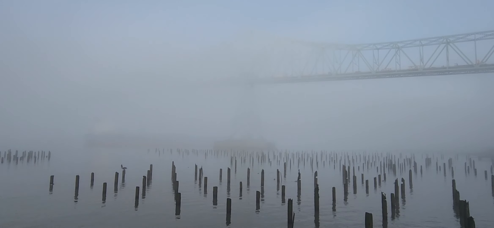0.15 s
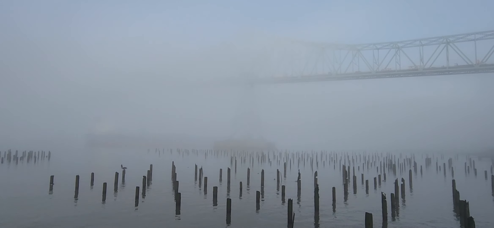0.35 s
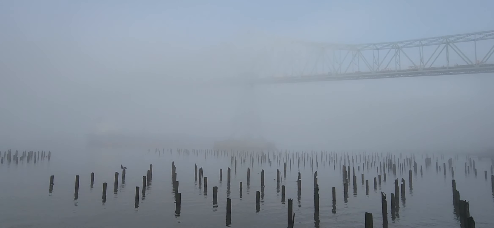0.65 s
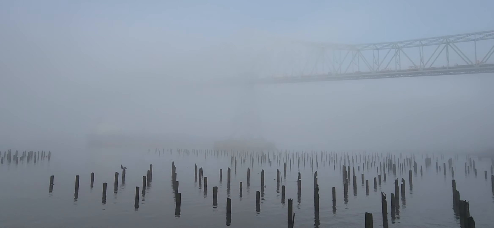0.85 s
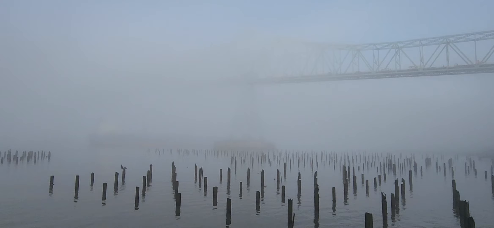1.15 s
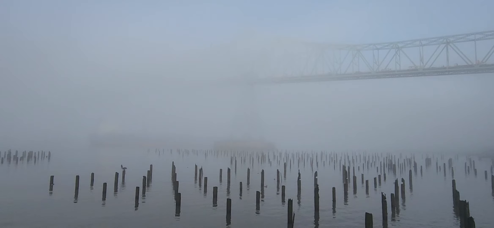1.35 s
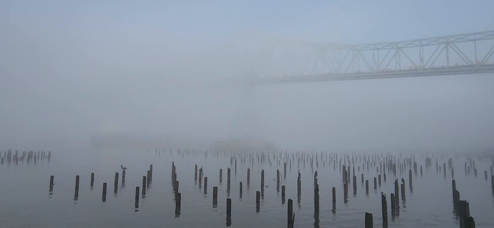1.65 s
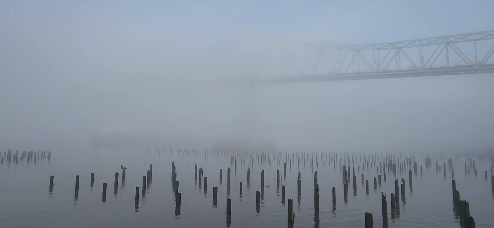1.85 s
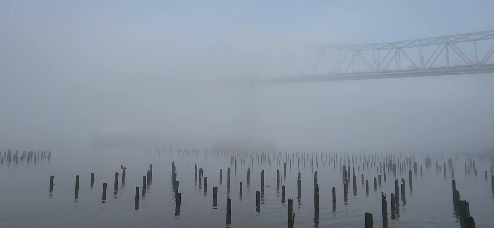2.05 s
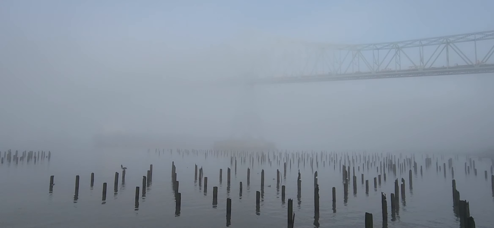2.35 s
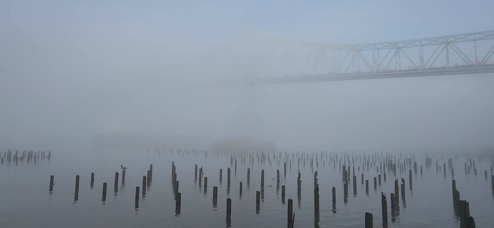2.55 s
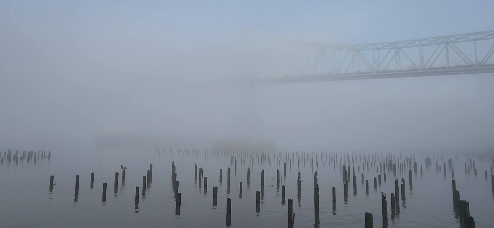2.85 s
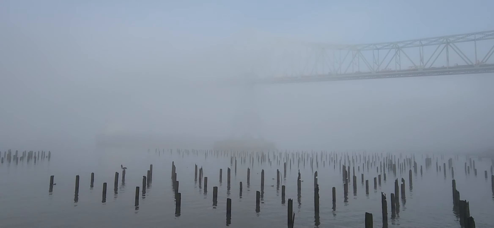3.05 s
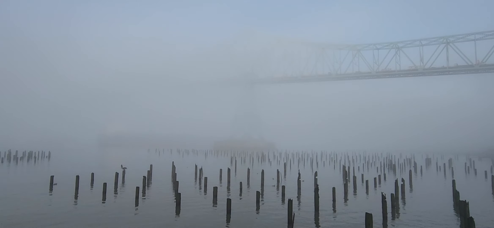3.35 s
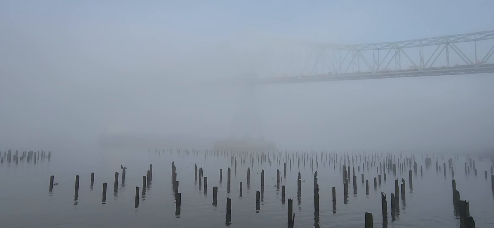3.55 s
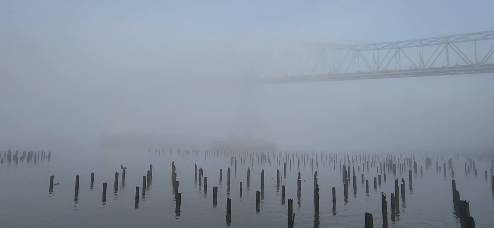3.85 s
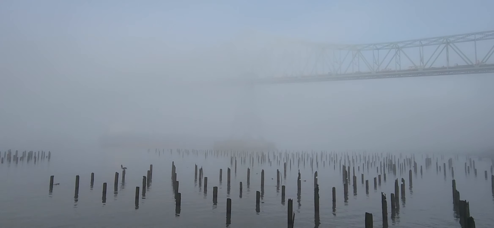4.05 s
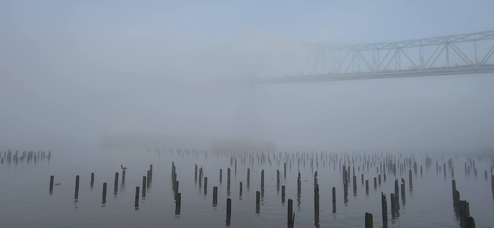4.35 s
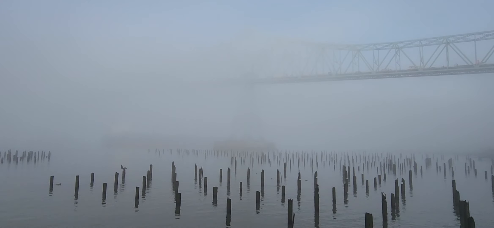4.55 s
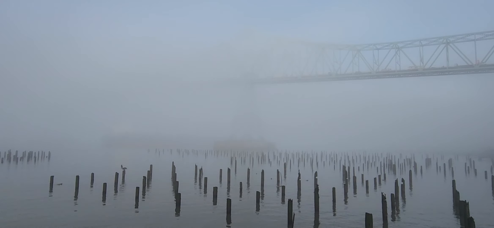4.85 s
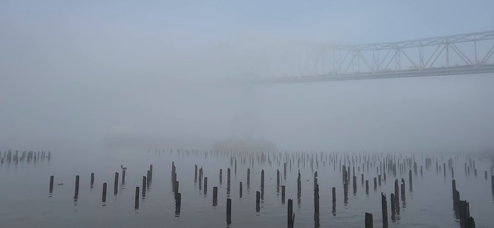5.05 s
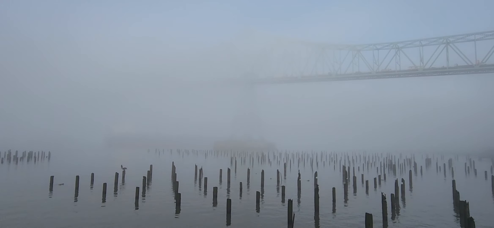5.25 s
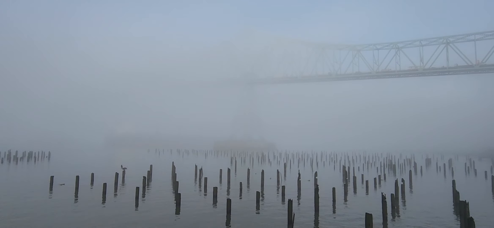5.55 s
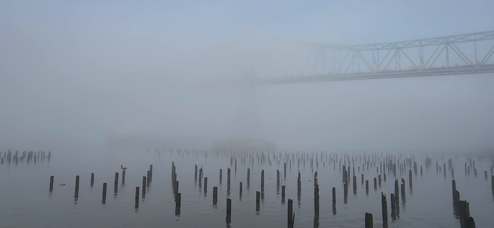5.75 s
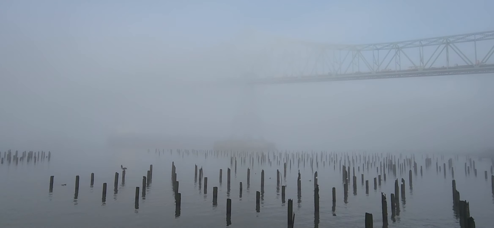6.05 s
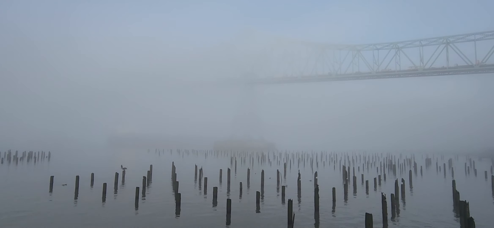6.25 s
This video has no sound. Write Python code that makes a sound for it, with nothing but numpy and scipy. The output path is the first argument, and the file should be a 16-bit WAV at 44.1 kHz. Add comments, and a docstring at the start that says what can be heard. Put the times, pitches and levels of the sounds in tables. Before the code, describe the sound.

Heard from an open riverbank, a low foghorn note hangs throughout over the rumble and hum of a distant ship, the tones wavering as they cross the water. Early on, birds ahead and to the right whistle brief rising and falling chirps, one breaking into a sharp squeal. After that the engine throb carries on with a soft wash of far traffic and faint wavelets, and a last small chirp.

```python
"""A low diesel throb and one held horn note, far across a foggy river, over an even wash of traffic and water.
The ship's six cylinders fire in a steady rhythm while its other machines hum; the tones fade and swell
as they carry over the water. Wavelets fizz at old pilings and a very faint whine hangs on the left.
Birds whistle short arched chirps, echoed by the shore; one loud squeal breaks an octave down."""
import sys
import numpy as np
from scipy import signal
from scipy.fft import rfft, irfft
from scipy.io import wavfile

SR = 44100
rng = np.random.default_rng(int(sys.argv[2]) if len(sys.argv) > 2 else 0)


def store_wav(level_fs):
    """Save 16-bit WAV to argv[1]."""
    pcm = np.round(np.clip(np.atleast_2d(level_fs), -1, 1) * 32767)
    wavfile.write(sys.argv[1], SR, pcm.T.astype(np.int16))


N = 281799
TIME_S = np.arange(N) / SR
BINS_HZ = np.maximum(np.fft.rfftfreq(N, 1 / SR), 1)
LEFT_BANK_LEAD_MS = .44

# Firing tone and its octave, over the water: time_s, level_db
FIRING_FADE = [(0.0, -46), (1.4, -39), (2.8, -41.5), (3.1, -36), (4.2, -36), (4.4, -41), (4.65, -35.5),
               (5.3, -33), (6.39, -34.5)]
FIRING_OCTAVE_FADE = [(0.0, -35.5), (1.41, -28.5), (2.31, -30.5), (3.06, -28), (3.24, -33.5), (4.18, -37),
                      (4.5, -56), (4.61, -38.5), (5.07, -42), (5.3, -32.5), (5.64, -38), (6.39, -32.5)]
# Orders in step with the firing: firing_multiple, level_db
THROB_ORDERS = [(3 / 2, -46), (5 / 2, -46.5), (3, -46.5)]
# Weak orders from unequal cylinders: firing_multiple, level_db
IMBALANCE_ORDERS = [(7 / 6, -56), (5 / 3, -53), (11 / 6, -57), (13 / 6, -56.5), (7 / 3, -56.5)]
# Exhaust rumble: freq_hz, density_db_per_hz
RUMBLE_SPECTRUM = [(12, -94), (24, -74.5), (42, -59), (90, -62), (135, -62), (165, -64.5), (195, -69.5),
                   (230, -70), (280, -80.5), (450, -105), (900, -170)]
# Steady ship machines: pitch_hz, level_db
MACHINE_HUMS = [(58.5, -47), (117.1, -49), (305.5, -58.5), (313.6, -56.5), (359, -63)]
# Machine hunting in speed: time_s, pitch_hz, level_db
HUNTING_HUM = [(0, 135, -41), (.35, 133, -56), (1.2, 135, -51.5), (1.5, 135.7, -55.5), (2.3, 136, -47),
               (3.55, 135, -41.5), (4.25, 138, -58), (4.5, 136, -40), (4.7, 137.6, -48), (5.0, 138.4, -40),
               (5.6, 134.5, -49), (5.85, 136, -40), (6.39, 137, -45)]
# Horn fundamental and octave, over the water: time_s, level_db
HORN_ROOT_FADE = [(0.0, -48), (0.16, -42), (0.75, -48), (1.1, -42), (1.4, -46), (2.37, -40.5),
                  (3.15, -40.5), (3.75, -48.5), (4.3, -47), (4.52, -41), (5.0, -39), (5.55, -39.5),
                  (5.9, -48.5), (6.12, -41), (6.23, -59), (6.39, -52)]
HORN_OCTAVE_FADE = [(0.0, -53), (0.34, -46), (0.75, -60.5), (1.25, -59), (1.6, -49), (2.1, -44.5),
                    (2.5, -56.5), (2.9, -67), (3.11, -52), (3.4, -59), (5.15, -59.5), (5.5, -54),
                    (5.92, -50), (6.16, -59), (6.39, -63)]
# Open-air noise between the ears: freq_hz, correlation
EAR_CORRELATION = [(60, 0.76), (170, 1), (300, 0.56), (540, 0.78), (680, 0.21), (880, 0.6), (1150, -0.16),
                   (1500, -0.78), (1850, -0.13), (8000, -0.0053)]
# Far traffic and water: freq_hz, density_db_per_hz
WASH_SPECTRUM = [(150, -83.5), (310, -73), (520, -74.5), (780, -76.5), (1100, -83), (1450, -82),
                 (1830, -90.5), (2150, -88.5), (2450, -99.5), (3700, -101), (4300, -102.5), (5000, -108.5),
                 (5550, -104.5), (6250, -113), (7200, -106), (8100, -109), (9200, -132), (15000, -134)]
# Swell of the wash: time_s, gain_db
WASH_GAIN = [(0, 0), (2, 0), (3.6, -0.1), (4.5, -0.3), (4.93, 0.9), (5.2, .6), (5.6, -0.1), (6.39, 0.6)]
# Wash arriving along the left bank: freq_hz, power_share
LEFT_BANK_SHARE = [(200, 0.0059), (500, 0.021), (1000, 0.21), (2100, 0.28), (8000, 0.16)]
# Balance of the wash: freq_hz, left_minus_right_db
WASH_BALANCE = [(200, -3.5), (320, 3.5), (550, -1), (1400, -0.4), (1850, 2), (2200, 1), (2550, 10.5),
                (3700, 6.5), (5200, -0.1), (6800, 3), (8000, 6.5)]
# Wavelets at the pilings: crest_s, half_width_s, level_db
WAVELETS = [(0.599, .2, -80), (2.95, .12, -79.5), (3.8, 0.21, -77), (4.137, .05, -75),
            (4.65, 0.0925, -76.5), (4.92, .13, -79)]
# Wavelet fizz: freq_hz, relative_db
FIZZ_SPECTRUM = [(1500, -13.5), (3300, -0.5), (5500, 0), (7500, -6), (8400, -11.5), (9300, -29.5)]
# Chirps: top_s, rise_s, fall_s, top_hz, pointedness (1 = round), level_db, accent_db, flutter_db,
# right_lead_ms
CHIRP_ARCHES = [ (0.389, 0.040, 0.046, 2760, .6, -50.5, 1, 3, .58),
                (0.442, 0.016, 0.016, 2070, 1, -57, -1, 2.8, 0.54),
                (1.425, .085, 0.047, 2200, 3.7, -53.5, 0, 2.5, 0.042),
                (2.002, .042, .056, 3137, 2.0, -53, -0.5, 1.5, .05),
                (2.695, .034, 0.046, 2415, 1.4, -55.5, 5, 1.4, .58),
                (6.336, 0.021, 0.031, 2370, 1.4, -59, 0, 2.5, .58)]
# Microphone colouring of the birds: freq_hz, gain_db, left_minus_right_db
BIRD_EQ = [(1770, -10, -1), (2060, -1.5, 2.5), (2320, -6, 6.5), (2460, -5, 4.5), (2620, -9.5, 1),
           (3150, -5.5, -3), (3520, -9.5, 1.5), (3850, -14.5, 0), (4900, -8.5, -1), (6200, -20.5, -1.5),
           (7500, -8.5, 6.5)]
# Shore reflections: delay_s, level_db, t60_s
SHORE_ECHOES = [(0, -6, .35), (0, -8, .85), (.055, -14, .07), (0.224, -12, 0.15)]


def from_db(db):
    """Decibels to gain."""
    return 10 ** (np.asarray(db) / 20)


def unit_rms(x):
    """Scale to unit power."""
    return x / np.sqrt(np.mean(x ** 2) + 1e-20)


def over_time(rows):
    """Each value column, interpolated per sample."""
    time_s, *columns = np.transpose(rows)
    return [np.interp(TIME_S, time_s, column) for column in columns]


def over_bins(rows):
    """Table interpolated per bin, over log frequency."""
    freq_hz, value = np.transpose(rows)
    return np.interp(np.log(BINS_HZ), np.log(freq_hz), value)


def pan(left_minus_right_db):
    """Left and right gains."""
    return from_db(np.array([[.5], [-.5]]) * left_minus_right_db)


def from_left(lead_ms):
    """Spectral factors that delay the right ear."""
    return np.exp(-2j * np.pi * BINS_HZ * lead_ms * 1e-3 * np.array([[0], [1]]))


def from_right(x, lead_ms):
    """Mono to stereo, right ear early."""
    return np.array([x, np.interp(TIME_S + lead_ms * 1e-3, TIME_S, x)])


def drift(rate_hz):
    """Smooth random wander, unit spread."""
    hop = 100
    pole = np.exp(-2 * np.pi * rate_hz * hop / SR)
    slow = signal.lfilter([1], [1, -2 * pole, pole * pole], rng.standard_normal(2 * N // hop))
    slow = unit_rms(slow[-(N // hop + 2):])
    return np.interp(np.arange(N) / hop, np.arange(len(slow)), slow)


def white_spectra(channels):
    """Independent noises, unit power per Hz."""
    return rfft(rng.standard_normal((channels, N))) * np.sqrt(SR / 2)


def open_air():
    """Spectra of noise from all round: alike at both ears in the bass, unrelated in the treble."""
    mid, side = white_spectra(2)
    alike = np.clip(over_bins(EAR_CORRELATION), -1, 1)
    return np.sqrt((1 + alike) / 2) * mid + np.sqrt((1 - alike) / 2) * side * [[1], [-1]]


def far_tone(cycles, level_db, scatter, rate_hz):
    """Direct sine plus scattered copies of wandering strength and phase."""
    phase = 2 * np.pi * (cycles % 1)
    in_phase = (1 + scatter * drift(rate_hz)) * np.sin(phase)
    quadrature = scatter * drift(rate_hz) * np.cos(phase)
    return from_db(level_db) * unit_rms(in_phase + quadrature)


def diesel(firing_hz=45.01, sag_hz_per_s=.02, wander_hz=.015):
    """Only low orders of the exhaust pulses carry; half orders in step with them make the throb."""
    cycles = np.cumsum(firing_hz - sag_hz_per_s * TIME_S + wander_hz * drift(.38)) / SR
    firing_db, = over_time(FIRING_FADE)
    octave_db, = over_time(FIRING_OCTAVE_FADE)
    tones = far_tone(cycles, firing_db, scatter=.035, rate_hz=3.6)
    tones += far_tone(2 * cycles, octave_db, scatter=.017, rate_hz=1)
    for multiple, level_db in THROB_ORDERS:
        tones += far_tone(multiple * cycles, level_db, scatter=.4, rate_hz=.5)
    for multiple, level_db in IMBALANCE_ORDERS:
        tones += far_tone(multiple * cycles + rng.random(), level_db, scatter=.2, rate_hz=.7)
    rumble = irfft(open_air() * from_db(over_bins(RUMBLE_SPECTRUM)), N)
    return tones + rumble


def machines():
    """Generators and fans hum at their own speeds; one hunts and beats against the exhaust."""
    hunting_hz, hunting_db = over_time(HUNTING_HUM)
    steady = sum(far_tone(hz * TIME_S, db, scatter=.63, rate_hz=.9) for hz, db in MACHINE_HUMS)
    return steady + far_tone(np.cumsum(hunting_hz) / SR, hunting_db, scatter=.13, rate_hz=1.7)


def horn(pitch_hz=175.63, third_db=-60):
    """Distance leaves three partials; the upper two waver more, the octave differently at each ear."""
    cycles = pitch_hz * TIME_S
    root_db, = over_time(HORN_ROOT_FADE)
    octave_db, = over_time(HORN_OCTAVE_FADE)
    root = far_tone(cycles, root_db, scatter=.07, rate_hz=3)
    octave = far_tone(2 * cycles, octave_db, scatter=.25, rate_hz=3.7)
    third = far_tone(3 * cycles, third_db, scatter=.97, rate_hz=4)
    side = far_tone(2 * cycles + rng.random(), octave_db - 8.5, scatter=.67, rate_hz=3.3)
    return root + octave + third + side * [[1], [-1]]


def wash():
    """Far traffic and water merge into a slightly swelling hush, partly from the left bank."""
    swell_db, = over_time(WASH_GAIN)
    share = over_bins(LEFT_BANK_SHARE)
    all_round = np.sqrt(1 - share) * open_air()
    left_bank = np.sqrt(share) * white_spectra(1) * from_left(LEFT_BANK_LEAD_MS)
    colour = from_db(over_bins(WASH_SPECTRUM)) * pan(over_bins(WASH_BALANCE))
    return from_db(swell_db) * irfft((all_round + left_bank) * colour, N)


def whine(centre_hz=7990, half_width_hz=70, peak_db_per_hz=-102, pan_db=9):
    """Very faint narrow noise band on the left."""
    band = from_db(peak_db_per_hz) / (1 + ((BINS_HZ - centre_hz) / half_width_hz) ** 2)
    return pan(pan_db) * irfft(white_spectra(1) * from_left(LEFT_BANK_LEAD_MS) * band, N)


def lapping(ripple_db=-79.5, grains_per_s=2300, grain_spread_db=3, flutter_db=4, flutter_hz=9):
    """Ripples fizz faintly throughout, more when a wavelet meets the pilings."""
    power = from_db(ripple_db) ** 2
    for crest_s, half_width_s, level_db in WAVELETS:
        power = power + from_db(level_db) ** 2 * np.exp(-((TIME_S - crest_s) / half_width_s) ** 2)
    onsets = rng.random((2, N)) < grains_per_s / SR
    sizes = from_db(grain_spread_db * np.minimum(rng.exponential(1, (2, N)), 3))
    grains = onsets * sizes * rng.choice([-1, 1], (2, N))
    fizz = unit_rms(irfft(rfft(grains) * from_db(over_bins(FIZZ_SPECTRUM)), N))
    return fizz * np.sqrt(power) * unit_rms(from_db(flutter_db * drift(flutter_hz)))


def chirps(rest_hz=1903, octave_db=-22.5, waver=.014, edge_exponent=.19):
    """Unsteady whistles arch up from the resting pitch and back, stressed or swallowed at the top."""
    out = np.zeros((2, N))
    detune, flutter = 1 + waver * drift(80), drift(82)
    for top_s, rise_s, fall_s, top_hz, pointedness, db, accent_db, flutter_db, lead_ms in CHIRP_ARCHES:
        start_s, end_s = top_s - rise_s, top_s + fall_s
        on = (TIME_S > start_s) & (TIME_S < end_s)
        arch = np.sin(np.interp(TIME_S[on], [start_s, top_s, end_s], [0, np.pi / 2, np.pi]))
        height = arch ** pointedness
        pitch_hz = (rest_hz + (top_hz - rest_hz) * height) * detune[on]
        phase = 2 * np.pi * np.cumsum(pitch_hz) / SR
        whistle = np.sin(phase) + from_db(octave_db) * np.sin(2 * phase)
        gain = from_db(db + accent_db * height + flutter_db * flutter[on])
        call = np.zeros(N)
        call[on] = np.sqrt(2) * gain * arch ** edge_exponent * whistle
        out += from_right(call, lead_ms)
    return out


def shore(x):
    """Instant scatter off the pilings, a thin tail from the bank, two blurred echoes."""
    response = np.zeros((2, SR))
    for delay_s, level_db, t60_s in SHORE_ECHOES:
        age_s = TIME_S[:SR] - delay_s
        tail = rng.standard_normal((2, SR)) * (age_s >= 0) * from_db(-60 * np.abs(age_s) / t60_s)
        response += from_db(level_db) * tail / np.sqrt(np.sum(tail ** 2) / 2)
    return signal.fftconvolve(x, response, axes=1)[:, :N]


def squeal(top_s=1.626, rise_s=.047, fall_s=.055, rest_hz=1816, top_hz=5056):
    """Effort lifts the pitch until the voice doubles its period: an octave lower, and louder."""
    break_hz, break_width_hz, beak_hz, beak_width_hz = 3590, 90, 7600, 260
    unbroken_db, tilt_db_per_octave, broken_db, octave_db = -50, 7.5, -43, -16
    threshold, waver, flutter_db, octave_flutter_db, fall_accent_db = .045, .017, 2.5, 4, .6
    t_s = TIME_S - top_s
    effort = np.where(t_s < 0, np.exp(-np.abs(t_s / rise_s) ** 3), 1 / (1 + np.abs(t_s / fall_s) ** 2.4))
    gate = np.clip(effort / threshold - 1, 0, 1)
    unbroken_hz = rest_hz + (top_hz - rest_hz) * effort
    broken_hz = unbroken_hz / 2 * (1 + waver * drift(115))
    phase = 2 * np.pi * np.cumsum(broken_hz) / SR
    tilt_db = tilt_db_per_octave * np.log2(unbroken_hz / break_hz)
    unbroken = from_db(unbroken_db + tilt_db) * np.sin(2 * phase)
    broken = np.sin(phase) + from_db(octave_db + octave_flutter_db * drift(72)) * np.sin(2 * phase)
    for harmonic, peak_db in ((3, -16), (4, -22)):   # overtones light up at the beak's resonance
        resonance = from_db(peak_db) / (1 + ((harmonic * broken_hz - beak_hz) / beak_width_hz) ** 2)
        broken += resonance * np.sin(harmonic * phase)
    broken_share = .5 + .5 * np.tanh((unbroken_hz - break_hz) / break_width_hz)
    voice = (1 - broken_share) * unbroken + broken_share * from_db(broken_db) * broken
    gain = from_db(flutter_db * drift(110) + fall_accent_db * np.tanh(t_s / fall_s))
    return from_right(np.sqrt(2) * voice * gate * gain, lead_ms=.04)


def birds():
    """One bird almost straight ahead, one to the right; coloured per ear, echoed by the shore."""
    eq = np.array(BIRD_EQ)
    ears = from_db(over_bins(eq[:, [0, 1]])) * pan(over_bins(eq[:, [0, 2]]))
    direct = irfft(rfft(chirps() + squeal()) * ears, N)
    return direct + shore(direct)


def scene():
    """Ship and horn far ahead, birds and wavelets among the pilings, wash all round."""
    return diesel() + machines() + horn() + birds() + wash() + lapping() + whine()


def record(dry):
    """Steep low-pass."""
    stop_hz, rejection_db = 16300, 60
    return signal.sosfilt(signal.cheby2(14, rejection_db, stop_hz, fs=SR, output="sos"), dry)


dry = scene()
out = record(dry)
store_wav(out)
```